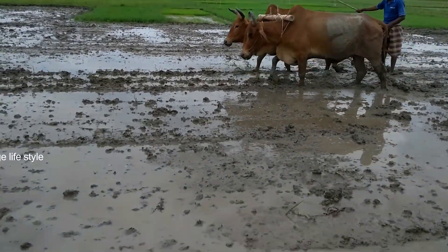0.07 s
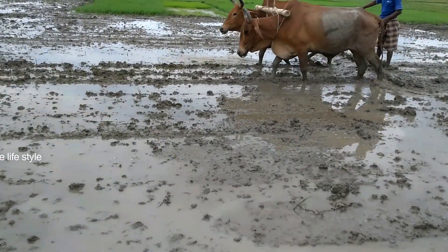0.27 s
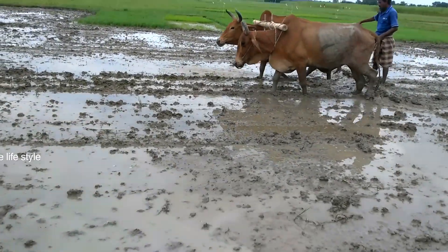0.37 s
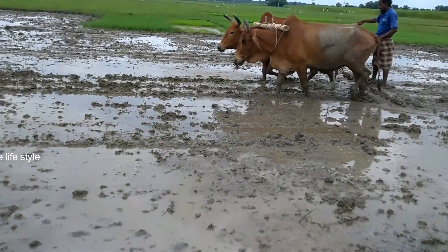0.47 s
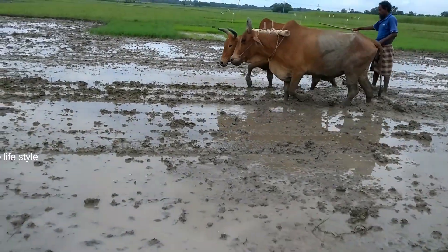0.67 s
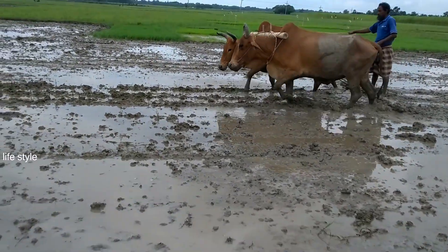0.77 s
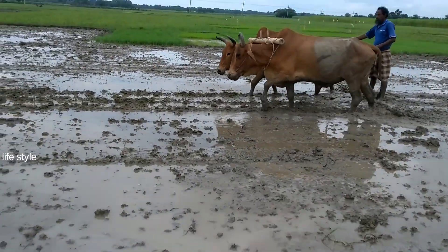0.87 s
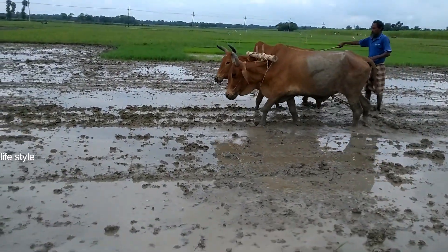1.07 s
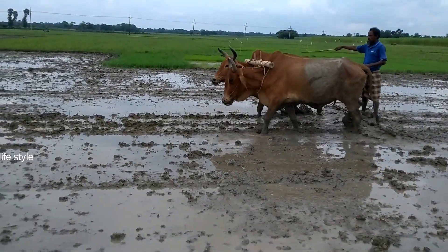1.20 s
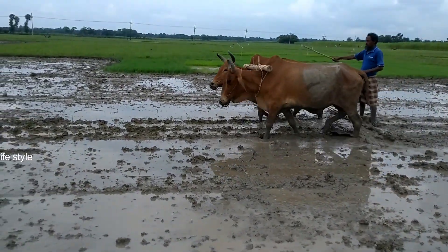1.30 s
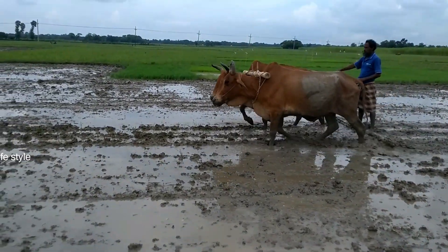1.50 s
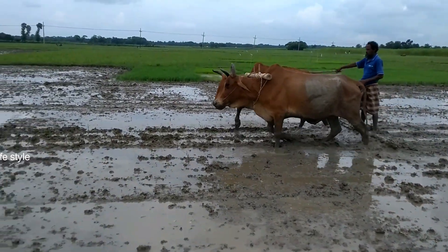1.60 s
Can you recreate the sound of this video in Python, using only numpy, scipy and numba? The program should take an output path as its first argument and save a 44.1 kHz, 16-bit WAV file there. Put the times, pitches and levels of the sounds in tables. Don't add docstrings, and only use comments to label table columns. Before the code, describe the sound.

Oxen hooves splash sharply through shallow muddy water, with bubbly plops and a faint distant engine throb

```python
import sys
import numpy as np
from scipy import signal
from scipy.fft import rfft, irfft
from scipy.io import wavfile
from scipy.ndimage import uniform_filter1d
from numba import njit

SR = 44100
rng = np.random.default_rng(int(sys.argv[2]) if len(sys.argv) > 2 else 0)


def wav_out(sig):
    wavfile.write(sys.argv[1], SR, np.round(np.clip(np.atleast_2d(sig).T, -1, 1) * 32767).astype(np.int16))


def natural_amplitude(level_db):
    exponent = np.asarray(level_db, float) / 20
    return 10 ** exponent


N = 72765

# (frequency [Hz], density [dB per Hz])
FIELD_COLOUR = [(40, -23), (120, -4.5), (300, -10.5), (700, -10), (1150, -17), (2300, -11), (7000, -18),
                (16000, -27)]
# (time [s], level [dB])
FIELD_LEVEL = [(0.0, -50), (.18, -51), (.3, -49.5), (0.43, -50), (.55, -48), (0.66, -52), (.8, -53),
               (0.91, -50), (1.074, -50), (1.2, -51.5), (1.308, -48.5), (1.42, -50), (1.534, -53.5),
               (1.65, -51)]
# (frequency [Hz], peak [dB], decay [cycles])
EXHAUST = [(111.4, -56, 3), (174, -54, 2.3), (258, -70, 5.3), (457, -54, 5)]
# (time [s], peak [dB], pitch [Hz], decay [cycles])
THUDS = [(.216, -40, 150, 3), (.276, -38, 720, 6), (.279, -39, 630, 6), (.279, -44, 290, 4),
         (.28, -43, 480, 5), (.292, -42.5, 165, 3), (.455, -46, 260, 1.5), (.533, -33.5, 170, 3),
         (.62, -48, 150, 3), (.858, -50, 200, 2), (1.18, -50, 130, 3), (1.3375, -40, 660, 5),
         (1.165, -52, 620, 5), (.218, -45, 450, 6), (.207, -48, 250, 3), (.464, -47, 120, 3),
         (1.345, -51, 105, 3), (1.243, -47, 690, 5), (1.251, -48, 640, 5)]
# (time [s], level [dB], length [s], centre [Hz])
SLOSHES = [
    (0.207, -68, 0.0082, 2500),
    (0.252, -48, 0.024, 2800),
    (0.271, -46.5, 0.01475, 719),
    (0.466, -72, 0.014, 1940),
    (0.516, -39, 0.035, 2040),
    (0.719, -47.5, 0.031, 2290),
    (0.863, -42.5, 0.05, 1680),
    (1.168, -46, 0.037, 1790),
    (1.336, -46, 0.019, 2920),
    (1.349, -42, 0.048, 1470),
]
# (time [s], peak [dB], pitch [Hz], left-right [dB])
BUBBLES = [(0.2079, -33, 2240, -10), (0.2118, -32.5, 2550, -26), (0.4748, -36.5, 1947, -19),
           (0.5068, -39, 1590, -7.5), (0.5205, -27, 2260, -8), (0.533, -38.5, 1560, -17.5),
           (0.5458, -39, 2110, -11), (0.884, -47, 1960, -18), (0.905, -37.5, 2100, -13),
           (1.1638, -38.5, 2103, 4), (1.169, -43, 2250, -3), (1.166, -46, 1330, 10.5),
           (1.3385, -32, 2920, -15), (1.365, -40, 2000, -21)]
# (time [s], peak [dB], ring [Hz], left-right [dB])
SLAPS = [(0.0826, -40, 5200, -15), (0.1336, -40, 5700, -14), (0.1891, -38, 5400, -17),
         (0.1907, -37, 5700, -16), (0.1917, -39, 5700, -17), (0.2042, -29, 6100, 10),
         (0.2083, -20, 6000, 14), (0.2098, -13, 5600, 7), (0.2106, -9, 6300, 9), (0.2114, -13, 6100, 8),
         (0.2222, -22, 5200, 14), (0.2317, -22, 6600, 12), (0.2341, -26, 6000, 12), (0.2352, -26, 5400, 15),
         (0.2359, -21, 5700, 13), (0.2519, -29, 6300, 19), (0.2553, -27, 5500, 19), (0.256, -25, 6000, 15),
         (0.265, -24, 6300, 16), (0.2659, -24, 5500, 13), (0.2667, -13, 5900, 15), (0.2681, -20, 5800, 6),
         (0.2691, -22, 6500, 11), (0.2793, -25, 5900, 13), (0.2841, -27, 5700, 12),
         (0.4704, -36, 5400, -17), (0.4714, -31, 5700, -14), (0.4724, -32, 6000, -16),
         (0.474, -32, 5400, -13), (0.4767, -31, 5300, -14), (0.4947, -30, 5700, -15),
         (0.501, -37, 5500, -17), (0.5024, -35, 5200, -13), (0.5463, -33, 4900, -6),
         (0.6335, -39, 6400, -11), (0.7254, -37, 5100, 19), (0.7482, -42, 5400, 13),
         (0.8348, -43, 5700, -14), (0.8388, -34, 5400, -17), (0.84, -36, 6100, -8),
         (0.9117, -37, 5100, -11), (0.9248, -37, 4600, -8), (1.3234, -36, 5900, -16),
         (1.3251, -36, 6000, -16), (1.3386, -29, 5400, -17), (1.3398, -31, 5300, -16),
         (1.3407, -32, 5600, -13), (1.3421, -31, 4700, -17), (1.3451, -32, 5100, -17),
         (1.3587, -32, 5400, -15)]
# (time [s], level [dB], fade [s], left-right [dB], tilt [dB per octave])
SPRAYS = [(0.049, -66.5, 0.041, -15, 6), (0.126, -55, 0.016, -5.5, 7), (0.187, -44.5, 0.0083, 0, 1),
          (0.202, -41.5, 0.004, 20, 4), (0.206, -32, 0.014, 7, 8), (0.23, -44, 0.018, 20.5, -0.5),
          (0.25, -44.5, 0.018, 16, 10), (0.262, -37.5, 0.0099, 17, 3.5), (0.273, -41.5, 0.019, 1.5, 0.5),
          (0.336, -69.5, 0.017, 15, 20), (0.47, -46.5, 0.012, -13.5, 1), (0.489, -61, 0.021, -33.5, 0),
          (0.517, -52, 0.045, -4, -2.5), (0.545, -52.5, 0.0048, -16, 9), (0.609, -57, 0.036, -3, 8.5),
          (0.72, -47.5, 0.012, 8, 2.5), (0.743, -59, 0.0038, -1, 20), (0.836, -52, 0.016, -13.5, 5),
          (0.872, -60.5, 0.017, -2, -1), (0.903, -52, 0.022, -6.5, 3.5), (0.954, -53, 0.021, 10.5, 7),
          (1.162, -59, 0.035, -1, -4), (1.242, -59, 0.037, -5, -3.5), (1.314, -48.5, 0.02, -12.5, 1),
          (1.3395, -45, 0.017, -12.5, -1.5), (1.364, -49, 0.03, -8, -0.5), (1.53, -59, 0.025, 3, -3)]
# (frequency [Hz], level [dB])
SPRAY_COLOUR = [(250, -18.5), (1100, -11.5), (2200, -2.5), (3500, -5.5), (4300, 6.5), (7000, 1),
                (9000, 5.5), (16000, -19.5)]
# (frequency [Hz], lead [radians])
PORT_LEAD = [(60, 0.073), (350, 1.1), (700, 1.34), (1250, 2.84), (1900, 1.91), (2500, 1.73), (3400, 3.2),
             (6000, 2.13)]
# (frequency [Hz], coherence [0-1])
PORT_LIKENESS = [(60, 0.17), (200, 1), (600, 0.83), (1250, 0.94), (2200, 0.2), (3500, 0.59), (4300, 0.27),
                 (7000, 0)]
# (frequency [Hz], left-right [dB])
PORT_BALANCE = [(90, -2.5), (200, 8), (700, 0), (2000, 4.5), (4500, -2), (15000, 7)]
# (frequency [Hz], share of the left-right level [ratio])
SHADOW = [(2500, -0.1851), (5000, 1.05), (8000, 1.19), (12000, 1.3)]
# (low [Hz], high [Hz], opens above [dB], share of the widening [0-1])
HOLES = [(3150, 3320, -74, 1), (3320, 3450, -71, 1), (3450, 3830, -58, 0)]
# (time [s], rise of the opening level [dB])
HOLE_WIDENS = [(.62, 12), (.72, 0), (1.37, 0), (1.39, 12), (1.46, 10), (1.5, 0)]
# (frequency [Hz], opens above [dB])
GATE_OPENS = [(8200, -85), (8900, -86), (9300, -95), (12500, -95), (13500, -91), (16000, -88)]

BEAT_S, BEAT_HZ = 0.044, 12.3
SLAP_CYCLES, SLAP_SPREAD, SLAP_SMEAR_S = 5.5, 0.11, 0.0003


def at(table, hz):
    table = np.array(table, float)
    return np.interp(np.log(np.maximum(hz, 1)), np.log(table[:, 0]), table[:, 1])


def walk(rate):
    k = int(SR / rate)
    steps = np.repeat(rng.standard_normal(N // k + 1), k)
    return 1.36 * uniform_filter1d(uniform_filter1d(steps, k), k)[:N]


@njit
def ring(out, start, turn, cycles, rise, left, right):
    for k in range(len(start)):
        fade = turn[k] / (2 * np.pi * cycles[k]) * 3
        p = np.exp(1j * turn[k] - fade)
        glide = np.exp(1j * turn[k] * rise * fade / 3)
        z, onset = 2 + 0j, 1.
        for i in range(start[k], min(out.shape[1], start[k] + int(6 / fade))):
            z *= p
            p *= glide
            onset *= np.exp(-1.5 * fade)
            out[0, i] += (z * left[k]).imag * (1 - onset)
            out[1, i] += (z * right[k]).imag * (1 - onset)
    return out


def ports(s, hz, cycles, rise, left, right):
    chance = rng.standard_normal((len(s), 2)).T
    likeness = np.clip(at(PORT_LIKENESS, hz), 0.02, 1)
    lead = at(PORT_LEAD, hz) + chance[0] * np.sqrt(-np.log(likeness) * 2)
    side = natural_amplitude(at(PORT_BALANCE, hz) / 2)
    phase = np.exp(3j * chance[1])
    start, turn = (s * SR).astype(np.int64), 2 * np.pi * hz / SR
    return ring(np.zeros((2, N)), start, turn, cycles + 0. * s, float(rise),
                left * side * phase, right / side * phase * np.exp(1j * lead))


def field():
    flicker_db, throb_db, gain_db = 1.8, 3, 0.5
    t = np.arange(N) / SR
    hz = np.fft.rfftfreq(N, 1 / SR)
    a, b = rfft(rng.standard_normal((2, N)))
    like = np.clip(at(PORT_LIKENESS, hz), 0, 1)
    side = natural_amplitude(at(PORT_BALANCE, hz) / 2)
    right = like * a * np.exp(1j * at(PORT_LEAD, hz)) + np.sqrt(1 - like ** 2) * b
    pair = np.array([a * side, right / side]) * natural_amplitude(at(FIELD_COLOUR, hz))
    place = 2 * np.log2(np.maximum(hz, 20) / 20)
    throb = np.cos(2 * np.pi * BEAT_HZ * (t - BEAT_S - 0.014))
    out = 0
    for band in range(21):
        level_db = flicker_db * walk(17.4) + (band < 10) * throb_db * throb
        out = out + natural_amplitude(level_db) * irfft(pair * np.maximum(1 - abs(place - band), 0), N)
    return out / out.std() * natural_amplitude(gain_db + np.interp(t, *np.array(FIELD_LEVEL).T))


def pump(count=20):
    scatter_db, jitter_s = 1.5, 0.004
    hz, db, cycles = np.array(EXHAUST, float).T
    chance = rng.standard_normal((count, 2, len(hz)))
    beats = BEAT_S + np.arange(count)[:, None] / BEAT_HZ
    s = np.maximum(beats + jitter_s * chance[:, 0], 0)
    size = natural_amplitude(db + scatter_db * chance[:, 1]).ravel()
    return ports(s.ravel(), np.tile(hz, count), np.tile(cycles, count), 0.026, size, size)


def thuds():
    s, db, hz, cycles = np.array(THUDS, float).T
    return ports(s, hz, cycles, 0.028, natural_amplitude(db), natural_amplitude(db))


def slosh(count=40):
    octaves, cycles = 0.4, 5.8
    s, db, length, hz = np.array(SLOSHES, float).T[:, :, None]
    chance = rng.random((len(SLOSHES), count, 3))
    size = (natural_amplitude(db) * (0.12 + chance[..., 2])).ravel()
    when = s + length * chance[..., 0]
    pitch = hz * 2 ** (octaves * (2 * chance[..., 1] - 1))
    return ports(when.ravel(), pitch.ravel(), cycles, 0.015, size, size)


def hits(table, cycles, rise, gain_db, spread, smear_s, count):
    s, db, hz, pan_db = np.array(table, float).T[:, :, None]
    neighbour = np.arange(count) > 0
    late, off = rng.random((len(table), count, 2)).transpose(2, 0, 1) * neighbour
    s = s + smear_s * late
    db = db + gain_db - 5 * neighbour
    hz = hz * (1 + spread * off * 2 * (-1) ** np.arange(count))
    left, right = natural_amplitude(db + pan_db / 2), natural_amplitude(db - pan_db / 2)
    return ports(s.ravel(), hz.ravel(), cycles, rise, left.ravel(), right.ravel())


def bubbles():
    return hits(BUBBLES, cycles=17, rise=0.004, gain_db=-3, spread=0.05, smear_s=0.005, count=3)


def slaps():
    return hits(SLAPS, SLAP_CYCLES, 0.014, -0.5, SLAP_SPREAD, SLAP_SMEAR_S, count=2)


def cracks():
    higher = np.array(SLAPS) * (1, 1, 2.1, 1)
    return hits(higher, SLAP_CYCLES, 0.0086, -8, 2 * SLAP_SPREAD, 2 * SLAP_SMEAR_S, count=3)


def spray(count=36000):
    rise_s, stop, trickle_db = 0.002, 1.63, -71
    cycles, scatter_db = 6, 2.2
    when, pitch, size = rng.random((count, 3)).T
    s, hz = when * N / SR, 200 * 80 ** np.sqrt(pitch)
    start, db, fade, pan_db, tilt_db = np.array(SPRAYS).T[:, :, None]
    age = np.maximum(s - start, 0)
    power = natural_amplitude(2 * (db + tilt_db * np.log2(hz / 5000)))
    power = power * (1 - np.exp(-age / rise_s)) ** 2 * np.exp(-(age / fade) ** stop)
    shade = natural_amplitude(pan_db * at(SHADOW, hz))
    drop = natural_amplitude(at(SPRAY_COLOUR, hz) - scatter_db * np.log(1.01 - size))
    trickle = natural_amplitude(2 * trickle_db)
    left = drop * np.sqrt((power * shade).sum(axis=0) + trickle)
    right = drop * np.sqrt((power / shade).sum(axis=0) + trickle)
    return ports(s, hz, cycles, 0.18, left, right)


def scene():
    return field() + spray() + slosh() + thuds() + pump() + slaps() + cracks() + bubbles()


def faint(x, lo_hz, hi_hz, opens_db):
    hz = np.fft.rfftfreq(N, 1 / SR)
    band = irfft(rfft(x) * (hz > lo_hz) * (hz < hi_hz), N)
    power = uniform_filter1d(band ** 2, size=800)
    closed = 1 / (1 + (power / natural_amplitude(2 * opens_db)) ** 6)
    return band * uniform_filter1d(closed, size=400)


def thin(x):
    from_hz, under_db, stops_db = 8150, 3.5, -76
    hz, _, lines = signal.stft(x, SR, nperseg=1024)
    power = abs(lines) ** 2
    near = uniform_filter1d(power, size=25, axis=1)
    quiet = near < natural_amplitude(2 * stops_db)
    weak = (power < natural_amplitude(2 * under_db) * near) & quiet & (hz[:, None] > from_hz)
    return signal.istft(lines * ~weak, SR, nperseg=1024)[1][:, :N]


def band_limit(x):
    return signal.sosfilt(signal.butter(12, 16480, fs=SR, output="sos"), x)


def record(dry):
    edge_hz, treble_db, low_cut_hz, gate_width_hz = 7864, -13, 99, 350
    hz = np.fft.rfftfreq(N, 1 / SR)
    shelf = natural_amplitude(np.interp(hz, (edge_hz - 150, edge_hz + 150), (0, treble_db)))
    low_cut = 1 / np.sqrt(1 + (low_cut_hz / (hz + 1)) ** 4)
    x = irfft(rfft(dry) * shelf * low_cut * (hz < 15950), N)
    wide_db = np.interp(np.arange(N) / SR, *np.array(HOLE_WIDENS).T)
    centre = x.mean(axis=0)
    lost = 0
    for lo, hi, db, share in HOLES:
        lost = lost + faint(centre, lo, hi, db + share * wide_db)
    for lo in np.arange(8150, 15950, gate_width_hz):
        lost = lost + faint(x, lo, lo + gate_width_hz, at(GATE_OPENS, lo))
    return band_limit(thin(x - lost))


dry = scene()
out = record(dry)
wav_out(out)
```